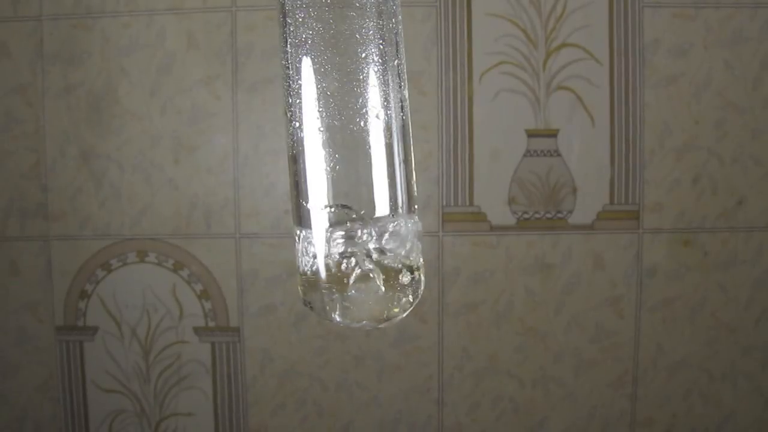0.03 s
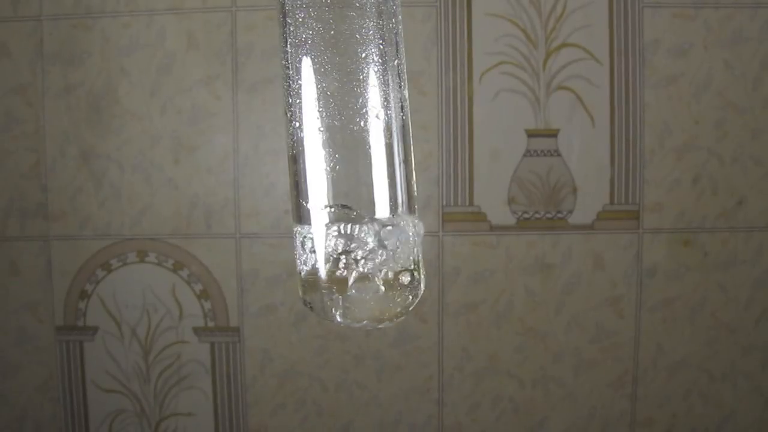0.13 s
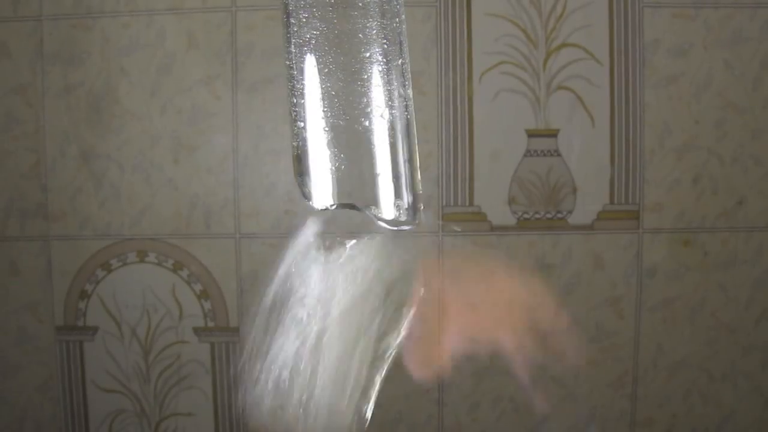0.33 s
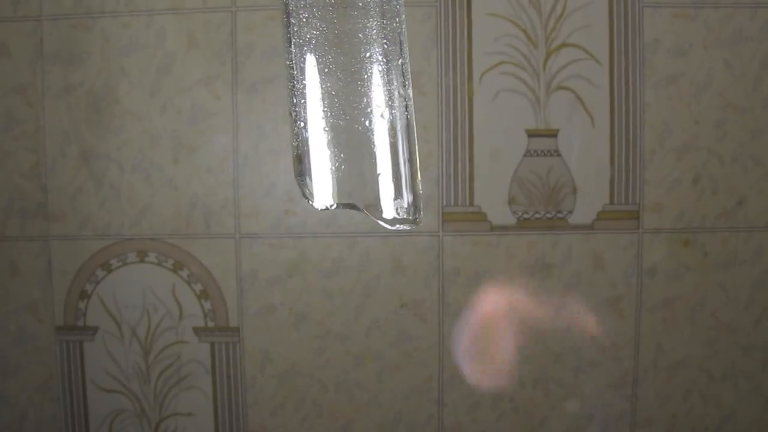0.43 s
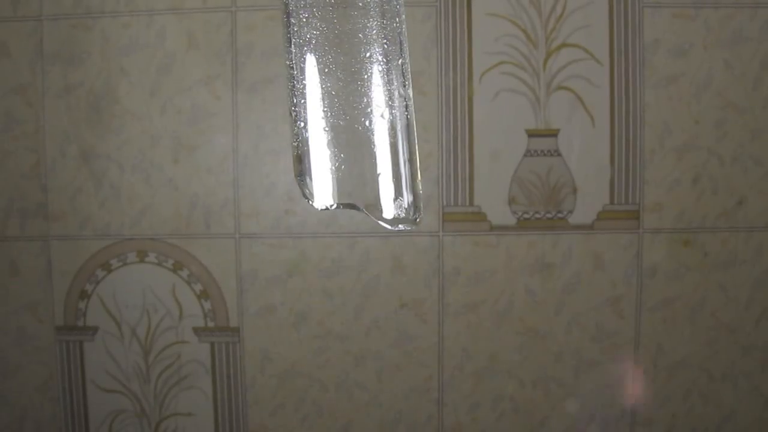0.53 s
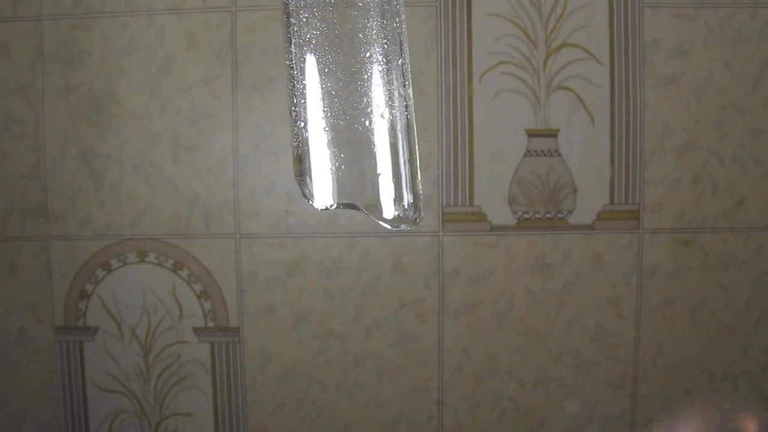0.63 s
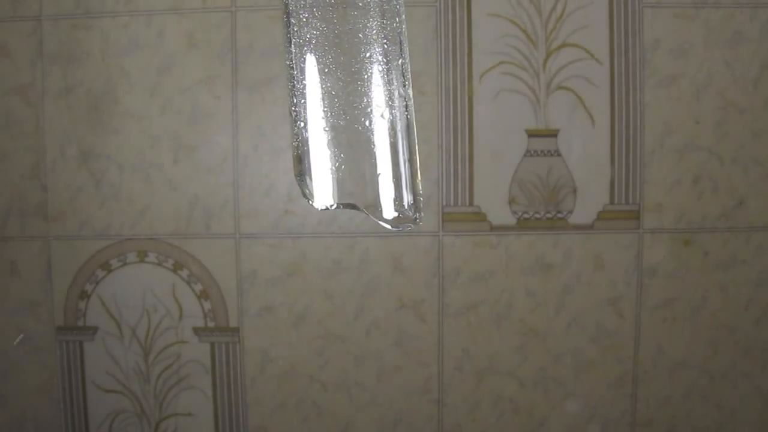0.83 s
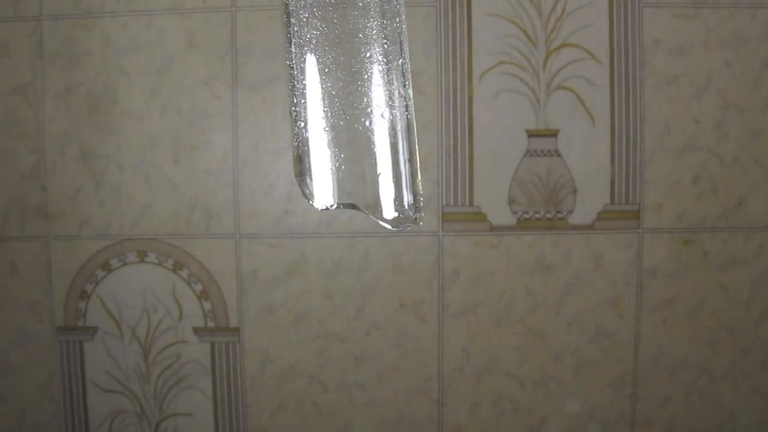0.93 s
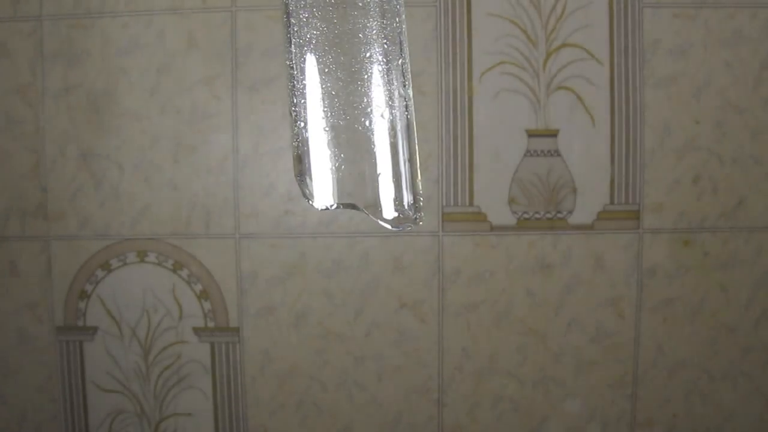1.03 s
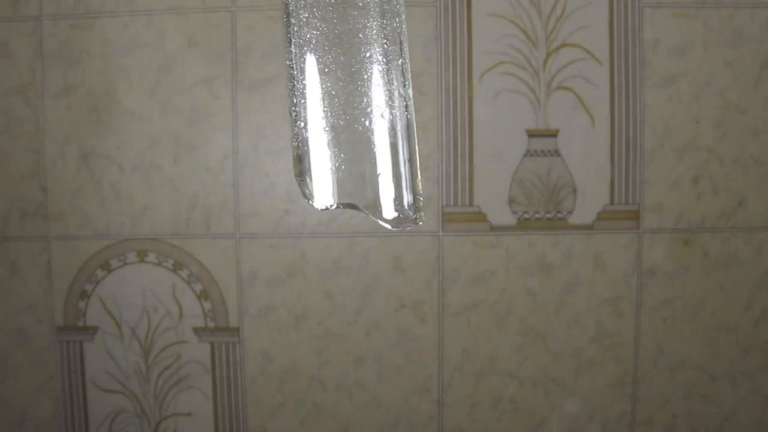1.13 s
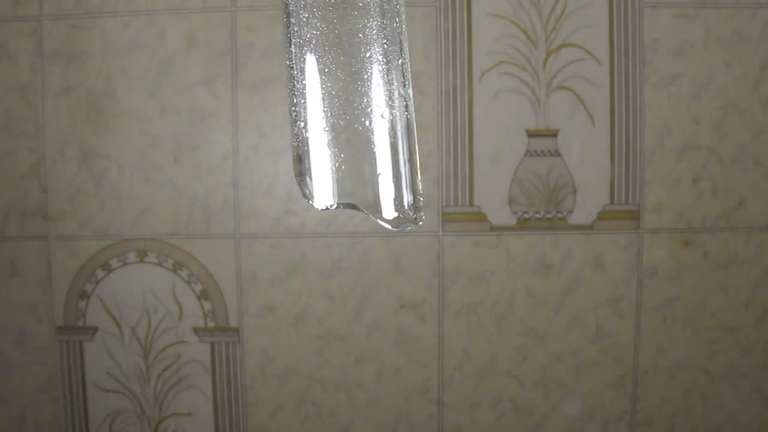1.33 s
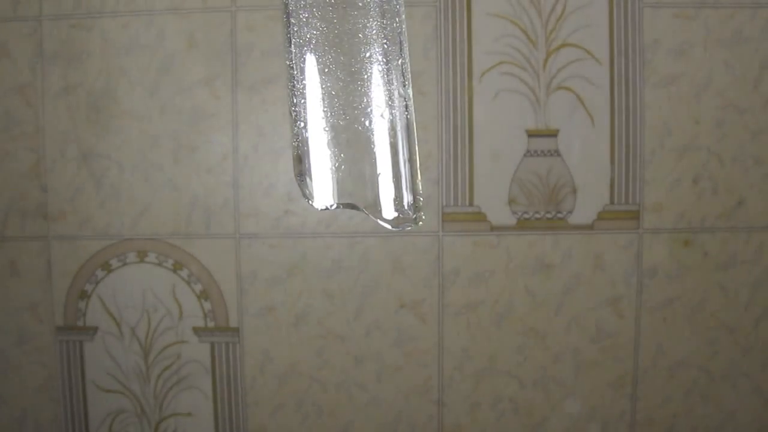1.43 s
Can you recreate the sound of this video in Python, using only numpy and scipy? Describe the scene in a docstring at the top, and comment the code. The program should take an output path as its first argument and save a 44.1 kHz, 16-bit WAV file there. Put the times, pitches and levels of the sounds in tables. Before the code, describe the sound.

A glass test tube bursts with a sharp pop, and the broken piece clinks and bounces.

```python
"""Liquid fizzes in an overheated glass test tube in a tiled room, over a faint rumble and hum.
Vapour leaks ever faster, until the pressure blows the bottom off with a pop and the open tube rings.
The broken piece knocks against something hard, then lands with a bright clink and bounces twice.
Small dull hits, probably the thrown liquid coming down, start just before it lands and patter on
afterwards. A faint sizzle comes last."""
import sys
import numpy as np
from scipy import signal
from scipy.fft import rfft, irfft
from scipy.io import wavfile

SR = 44100
rng = np.random.default_rng(int(sys.argv[2]) if len(sys.argv) > 2 else 0)


def generate_wav(sig):
    """Save sig (samples, or channels by samples) to the path in sys.argv[1] as 16-bit PCM at SR."""
    pcm = np.round(np.clip(np.atleast_2d(sig).T, -1, 1) * 32767).astype(np.int16)
    wavfile.write(sys.argv[1], SR, pcm)


N = 66150
TIME = np.arange(N) / SR
HZ = np.maximum(np.fft.rfftfreq(N, 1 / SR), 1)
BURST_S = .2476  # when the tube breaks

# how alike the room sounds in the two ears: pitch_hz, likeness (1 = the same)
EAR_LIKENESS = [(100, 0.31), (600, 0.83), (1300, 0.61), (2500, .2), (5000, 0.079), (14000, 0.19)]


def from_db(db):
    """Turn decibels into a number to multiply a sound by."""
    return 10 ** (np.asarray(db) / 20)


def at_pitch(points, hz=HZ):
    """Read between the (pitch_hz, value) rows of a table, with octaves evenly spaced."""
    pitches, values = np.transpose(points)
    return np.interp(np.log(hz), np.log(pitches), values)


def loudness(points):
    """A volume curve through (time_s, level_db) rows."""
    return from_db(np.interp(TIME, *np.transpose(points)))


def pan(db):
    """Left and right volumes: positive db leans left, negative leans right."""
    return from_db(np.array([[.5], [-.5]]) * db)


def decay(start_s, fade_s, attack_s=1e-4):
    """A quick rise, then a fade. Everywhere, fade_s is the time it takes to fall by 60 dB."""
    age = np.maximum(TIME - start_s, 0)
    return (1 - np.exp(-age / attack_s)) * from_db(-60 * age / fade_s)


def keep_band(sound, hz, side, order=2):
    """Keep the "high" or the "low" side of a pitch; a greater order cuts more steeply."""
    return signal.sosfilt(signal.butter(order, hz, side, fs=SR, output="sos"), sound)


def noise(spectrum, colour_db=0):
    """Stereo noise of fixed strength; the (pitch_hz, level_db) rows set only its tone."""
    # how much louder the room is on the left: pitch_hz, left_minus_right_db
    balance = [(60, 2), (200, -4.5), (1000, -5), (2400, -8.5), (5000, -3.5), (9000, -2.5), (14000, -3.5)]
    shared, opposite = np.exp(2j * np.pi * rng.random((2, len(HZ))))
    alike = at_pitch(EAR_LIKENESS)
    ears = np.sqrt(1 + alike) * shared + np.sqrt(1 - alike) * opposite * [[1], [-1]]
    hiss = irfft(ears * pan(at_pitch(balance)) * from_db(at_pitch(spectrum) + colour_db), N)
    return hiss / hiss.std()


def echoes(hits, spectrum, stretch=1):
    """Dense echoes of (start_s, level_db) hits off the tiles; each pitch band fades at its own rate."""
    # how long the room rings, before stretching: pitch_hz, fade_s
    room_fades = [(150, 0.4), (500, 0.3649), (1000, 0.3371), (2500, 0.3955), (5000, 0.293), (9000, 0.1856),
                  (14000, 0.16)]
    source, out = rfft(noise(spectrum)), 0
    for shares, (_, fade_s) in zip(np.eye(len(room_fades)), room_fades):
        band_shape = at_pitch([(hz, share) for (hz, _), share in zip(room_fades, shares)])
        power = sum((from_db(db) * decay(s, fade_s * stretch, attack_s=0.00071)) ** 2 for s, db in hits)
        out = out + irfft(source * band_shape, N) * np.sqrt(power)
    return out


def ring(hits, tones, spread=1):
    """Each hit sets off an object's own fading tones, which reach the two ears out of step."""
    ringing = np.zeros((2, N))
    for hz, db, fade_s in tones:
        shift = spread * np.arccos(at_pitch(EAR_LIKENESS, hz)) * rng.choice([-.5, .5])
        ringing += from_db(db) * decay(0, fade_s) * np.sin(2 * np.pi * hz * TIME + [[shift], [-shift]])
    clicks = np.zeros((1, N))
    for start_s, db in hits:
        clicks[0, int(start_s * SR)] += from_db(db)
    return signal.fftconvolve(ringing, clicks)[:, :N]


def snap(hits, spectrum, fade_s, attack_s=1e-4):
    """A short crack of noise for each (start_s, level_db) hit."""
    return noise(spectrum) * sum(from_db(db) * decay(s, fade_s, attack_s) for s, db in hits)


def background():
    """Steady room air, a low rumble that dips and returns, and mains hum."""
    # tone of the air and of the rumble: pitch_hz, level_db
    air_tone = [(59, -39.5), (100, -14), (146, -9.5), (391, -15.5), (443, -13), (688, -30), (849, -15),
                (1160, -23), (6090, -22), (15000, -41.5)]
    rumble_tone = [(15, -4), (35, -0.5), (50, 2), (70, -5.5), (120, -24), (300, -43.5)]
    # volume of the rumble: time_s, level_db
    rumble_levels = [(0, -47.5), (.05, -46.5), (.22, -45.5), (.33, -63), (.7, -61), (1.15, -57), (1.3, -56),
                     (1.5, -50.5)]
    air = from_db(-65) * noise(air_tone) * pan(db=0.5)
    rumble = noise(rumble_tone) * loudness(rumble_levels) * pan(db=3)
    hum = from_db(-65) * np.sin(2 * np.pi * 50 * TIME)
    return air + rumble + hum


def fizz():
    """Boiling liquid hisses and ticks, and leaking vapour swells; all die away after the burst."""
    # tone of the boiling and of the leak: pitch_hz, level_db
    boil_tone = [(88, -32), (150, -0.5), (182, -7.5), (490, -10), (656, -18.5), (1000, -15.5), (1130, -19),
                 (2140, -13), (2760, -14.5), (6470, -12), (15500, -18)]
    leak_tone = [(88, -25.5), (150, 1), (300, -28.5), (2450, -16), (3670, -7), (3970, -22.5), (4720, -17.5),
                 (15000, -24.5)]
    # volume of the boiling hiss: time_s, level_db
    boil_levels = [(0, -48.5), (.12, -48.5), (.2, -49.5), (.245, -46)]
    ticks_per_s, leak_rise_db_per_s = 400, 382
    tick_starts = rng.random(N) < ticks_per_s / SR
    ticks = from_db(-48) * signal.lfilter([1, -1], [1], tick_starts * rng.standard_normal(N))
    leak = noise(leak_tone) * from_db(-39 - leak_rise_db_per_s * np.abs(BURST_S - TIME))
    hiss = noise(boil_tone) * loudness(boil_levels)
    ending = np.where(TIME < BURST_S, 1, decay(BURST_S, fade_s=.26))
    return ((hiss + ticks) * pan(db=0.5) + leak) * ending


def patter():
    """Dull splats, probably falling liquid, each with its own tone; then soft bumps and a sizzle."""
    # the splats: start_s, level_db, treble_tilt_db_per_octave, pitch_hz
    splat_hits = [(.733, -50.5, 5.5, 793), (.755, -45, 3, 910), (1.072, -39, 2, 836),
                  (1.136, -38.5, 2, 1330), (1.181, -41, 2, 1110), (1.205, -37.5, 3.5, 1140),
                  (1.25, -46, 3.5, 990), (1.266, -40, -2, 1000), (1.294, -45.5, 4.5, 960),
                  (1.347, -37.5, -2, 1220), (1.404, -55.5, -9, 1210)]
    # tone of the splats and of the sizzle: pitch_hz, level_db
    splat_tone = [(88, -13), (150, -19), (229, -8.5), (318, -17.5), (386, -4.5), (567, -6.5), (742, 0),
                  (1180, -2.5), (2400, -11.5), (5200, -17.5), (7080, -29.5), (15000, -42.5)]
    sizzle_tone = [(1500, -1), (2800, -3), (5000, -3), (7000, -16), (14000, -38)]
    # the soft bumps: start_s, level_db
    bump_hits = [(1.294, -43), (1.425, -55)]
    # low ring of a bump: pitch_hz, level_db, fade_s
    bump_tones = [(141, -2.5, .2), (178, 0.5, 0.15), (235, -1, 0.14)]
    # volume of the sizzle: time_s, level_db
    sizzle_levels = [(1.435, -101), (1.448, -53.5), (1.5, -54.5)]
    peak_db, peak_width_octaves = 8, 0.41
    splats = 0
    for start_s, db, tilt, hz in splat_hits:
        octaves = np.log2(HZ / hz)
        colour_db = tilt * octaves + peak_db * np.exp(-(octaves / peak_width_octaves) ** 2)
        volume = from_db(db) * decay(start_s, fade_s=0.21, attack_s=0.0008)
        splats = splats + noise(splat_tone, colour_db) * volume
    room = from_db(-3) * echoes([row[:2] for row in splat_hits], splat_tone)
    bumps = ring(bump_hits, bump_tones) * pan(db=-5)
    sizzle = noise(sizzle_tone) * loudness(sizzle_levels)
    return splats + room + bumps + sizzle


def knock():
    """The flying piece grazes a hard surface, then strikes it with both of its edges."""
    # the two strikes: start_s, relative_level_db
    hits = [(.3898, -24.5), (.3911, -25.5)]
    # tone of the knock's noise: pitch_hz, level_db
    knock_tone = [(120, -35), (180, -12), (300, -20.5), (550, -26), (780, 3), (950, -12.5), (1200, -5),
                  (2700, -3), (3800, -6.5), (5200, -10.5), (7500, -13.5), (9000, -30), (14000, -34),
                  (15500, -48)]
    # tones set off by the first edge: pitch_hz
    pitches = [771, 807, 1472, 1679, 1808, 2110, 2627, 2694, 2761, 2808, 2894, 3644, 3984, 5970]
    # for each of those tones: level_db, fade_s
    fades = [(2, 0.33), (-13, .28), (-1, 0.2), (-2.5, 0.32), (-2.5, 0.32), (-13, .24), (-6.5, 0.13),
             (0.5, .26), (3, 0.22), (-2, 0.21), (-2, 0.24), (-1, .25), (-24, .16), (-14, .24)]
    # brief ring as the second edge touches: pitch_hz, level_db, fade_s
    contact_tones = [(2650, 9.5, 0.018), (3900, 6.5, 0.0083), (6170, 10, 0.0079)]
    tones = [(hz, db, fade_s) for hz, (db, fade_s) in zip(pitches, fades)]
    ringing = from_db(-9) * ring(hits[:1], tones) + ring(hits[1:], contact_tones)
    crack = from_db(13) * snap(hits, knock_tone, fade_s=0.0065)
    graze = snap([(.3885, -23)], knock_tone, fade_s=0.036)
    direct = keep_band(ringing * pan(db=-8.5) + crack + graze, hz=570, side="high")
    return direct + echoes(hits, knock_tone, stretch=0.81)


def clinks():
    """The piece lands farther off and bounces twice; both the glass and the surface ring."""
    # the landing and the bounces: start_s, relative_level_db
    hits = [(.8293, -17.5), (.9395, -39), (1.005, -51.5)]
    # main tones of the broken piece: pitch_hz
    pitches = [1507, 1711, 2380, 3461, 3951, 4117, 4188, 4792, 5130, 5652, 5977, 6128, 6563, 8217]
    # for each of those tones: level_db, fade_s
    fades = [(-17, 0.35), (-9, 0.27), (-2, 0.27), (-6, .33), (-11.5, 0.41), (-9, 0.17), (-12, 0.21),
             (-9.5, 0.27), (-3.5, 0.18), (-4.5, 0.14), (-4.5, 0.23), (-13.5, 0.19), (-12, 0.098),
             (-0.5, 0.15)]
    # low ring of the surface it lands on: pitch_hz, level_db, fade_s
    surface_tones = [(251.8, -27, .3), (590, -31, 0.38), (1094, -22, 0.14)]
    # tone of a clink, the duller last bounce and the glass's very high shimmer: pitch_hz, level_db
    clink_tone = [(88, -59), (150, -23.5), (248, -21.5), (433, -45), (589, -16.5), (972, -29.5),
                  (1090, -19.5), (1700, -11.5), (1870, -21), (2310, -8.5), (2920, -14.5), (4050, -4.5),
                  (6300, -1), (12100, -12.5), (15000, -17)]
    last_bounce_tone = [(700, -18), (1100, 3), (1400, -9), (2000, -4.5), (2600, 1), (3300, -5), (8000, -32)]
    shimmer_tone = [(13100, -45), (13850, -12), (14250, 0), (14550, -2), (14950, -32)]
    tones = [(hz, db, fade_s) for hz, (db, fade_s) in zip(pitches, fades)]
    # the jagged shape adds many weak, scattered high tones
    tones += [(hz, at_pitch(clink_tone, hz) - 16, 0.18) for hz in rng.uniform(5000, 12600, size=36)]
    ringing = (from_db(-7.5) * ring(hits, tones) + ring(hits, surface_tones)) * pan(db=-7.5)
    last_bounce = snap([(hits[-1][0], -49.5)], last_bounce_tone, fade_s=0.35)
    taps = from_db(4) * snap(hits, clink_tone, fade_s=0.065, attack_s=0.00021) * pan(db=2.5)
    direct = keep_band(ringing + last_bounce + taps, hz=450, side="high")
    shimmer = from_db(-13) * echoes(hits, shimmer_tone, stretch=1.4)
    room = from_db(-0.5) * echoes(hits, clink_tone, stretch=.9)
    return keep_band(direct + room, hz=14200, side="low", order=12) + shimmer


def burst():
    """The glass cracks, and a pulse of pressure escapes and leaves the air in the tube ringing."""
    # ring of the air in the opened tube: pitch_hz, level_db, fade_s
    tube_tones = [(1044.6, -7, 0.036), (1057, -29.5, 0.28), (2870, -22.5, 0.032), (4760, -40.5, .06)]
    # tone of the cracking glass and of the room's answer: pitch_hz, level_db
    crack_tone = [(1500, -11), (2500, -1.5), (5000, -2.5), (7500, 1.5), (10000, -1.5), (15000, -8)]
    echo_tone = [(59, -56), (100, -20), (213, -12), (246, -7.5), (359, -10), (391, -5.5), (703, -7.5),
                 (1020, -2.5), (1770, -38.5), (2090, -32), (2580, -34.5), (2920, -22.5), (3180, -32),
                 (4730, -31.5), (15000, -47)]
    # the pop is one lopsided swing of pressure, out and back
    swing_s, lopsidedness = 0.00034, 0.31
    progress = (TIME - BURST_S) / swing_s
    pop = from_db(-1.5) * (progress - lopsidedness) * np.exp(.5 * (1 - progress ** 2))
    tube = ring([(BURST_S + swing_s, 0)], tube_tones, spread=0.072)
    crack = snap([(BURST_S - 0.0011, -1.5)], crack_tone, fade_s=0.0064, attack_s=0.0011)
    room = echoes([(BURST_S + 0.0013, -23.5)], echo_tone, stretch=0.76)
    return (pop + tube) * pan(db=-6.5) + crack * pan(db=0.5) + room


def scene():
    """All the sounds in order of time, over the background."""
    return fizz() + burst() + knock() + clinks() + patter() + background()


def record(dry):
    """The pop overloads and has its peak flattened; the highest treble is then cut steeply."""
    cutoff_hz = 15800
    treble_cut = signal.ellip(10, .1, 80, cutoff_hz, fs=SR, output="sos")
    return signal.sosfilt(treble_cut, np.clip(dry, -1, 1))


dry = scene()
out = record(dry)
generate_wav(out)
```